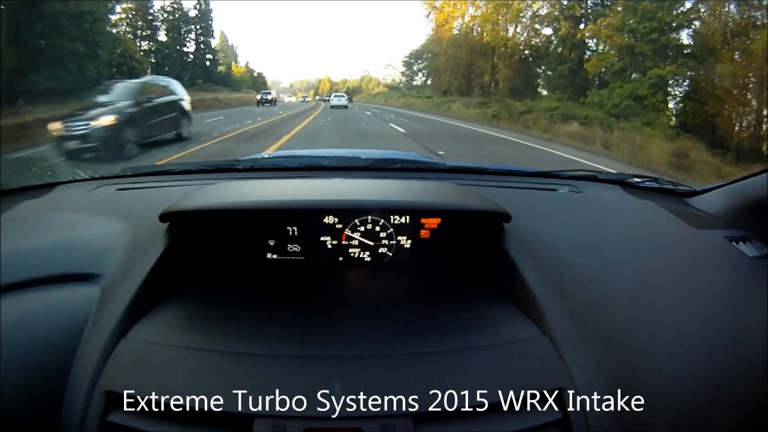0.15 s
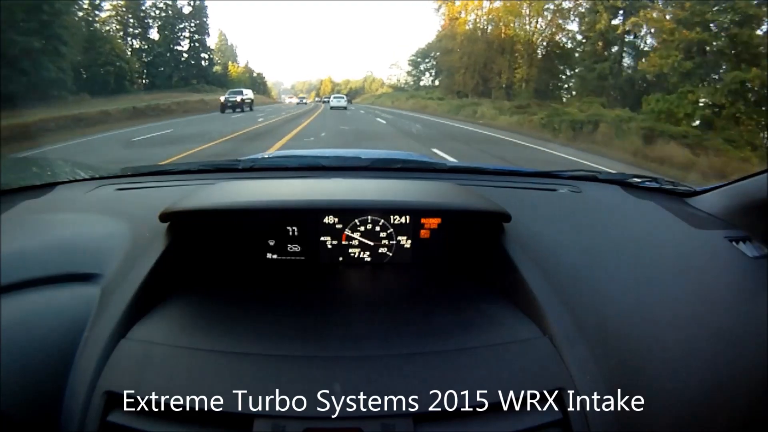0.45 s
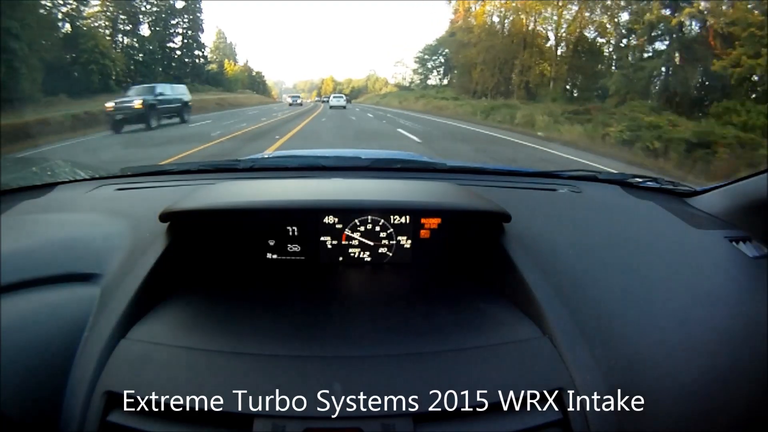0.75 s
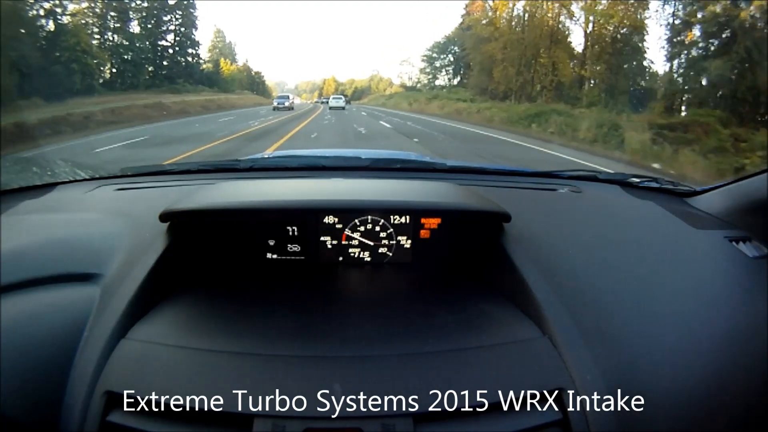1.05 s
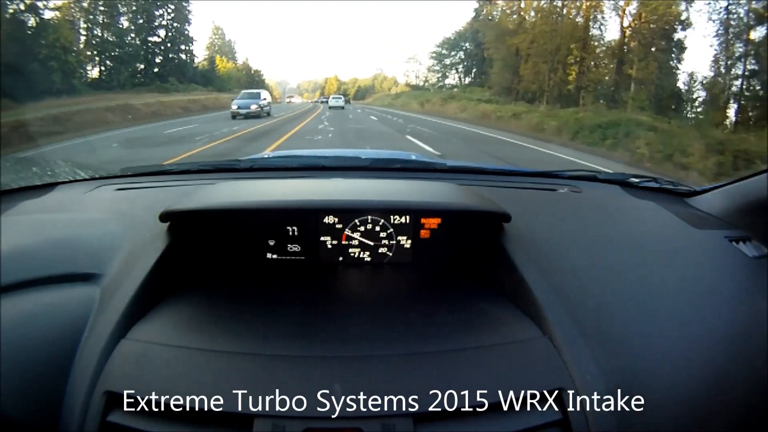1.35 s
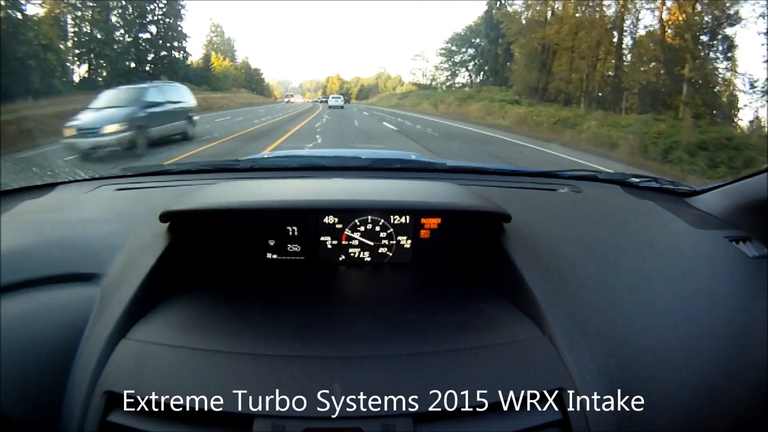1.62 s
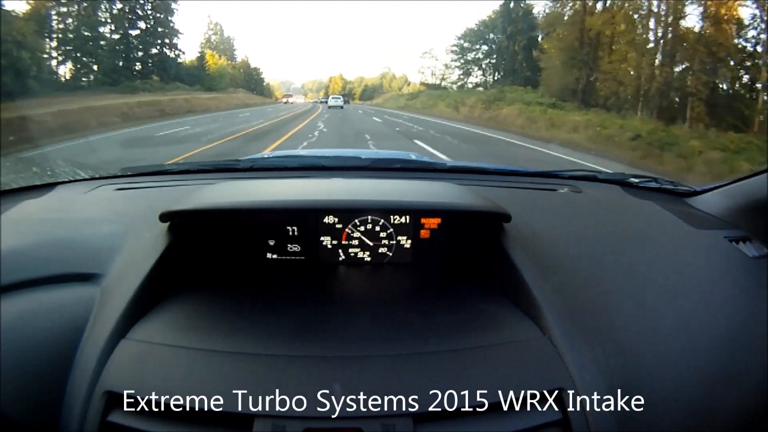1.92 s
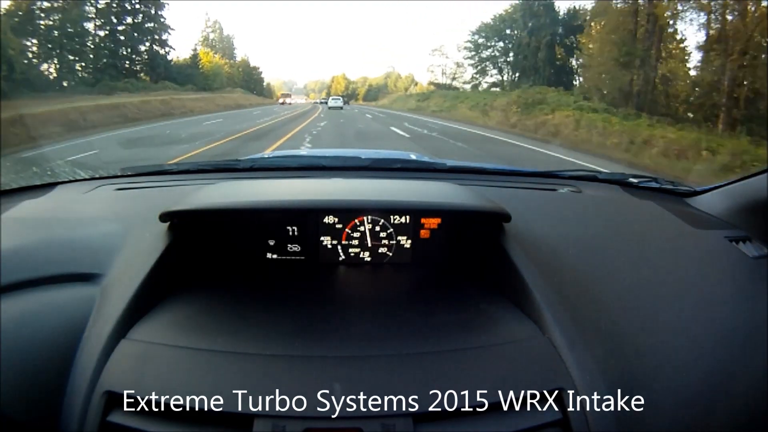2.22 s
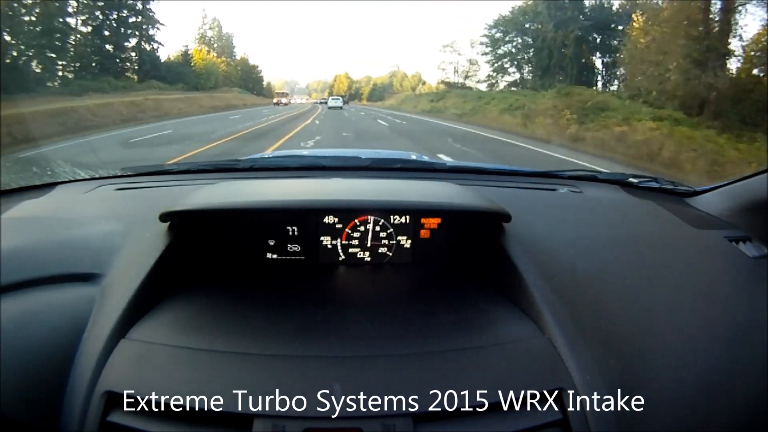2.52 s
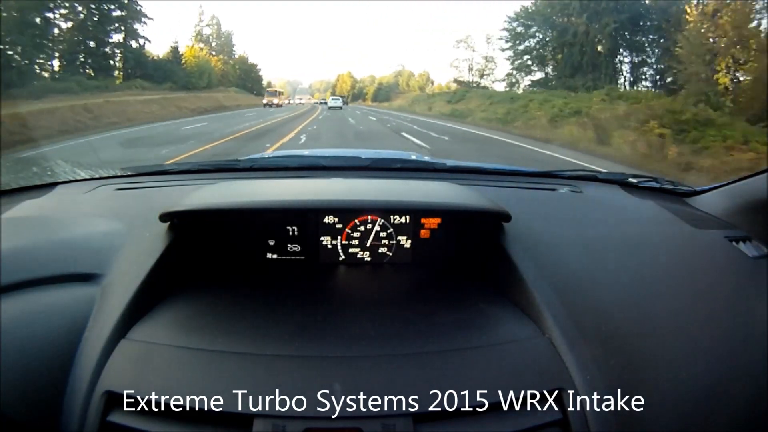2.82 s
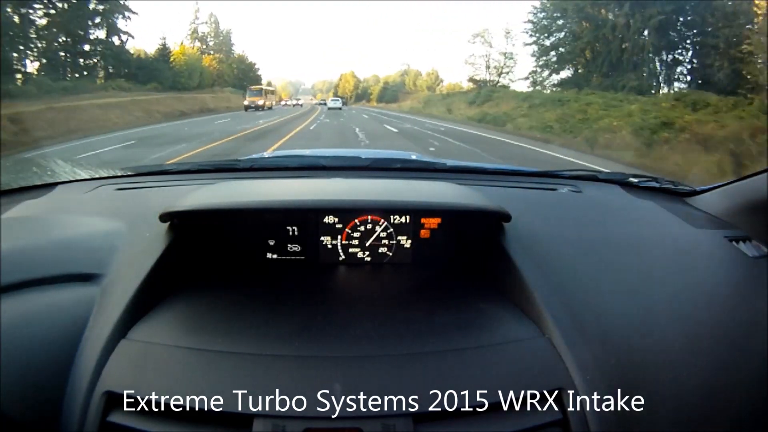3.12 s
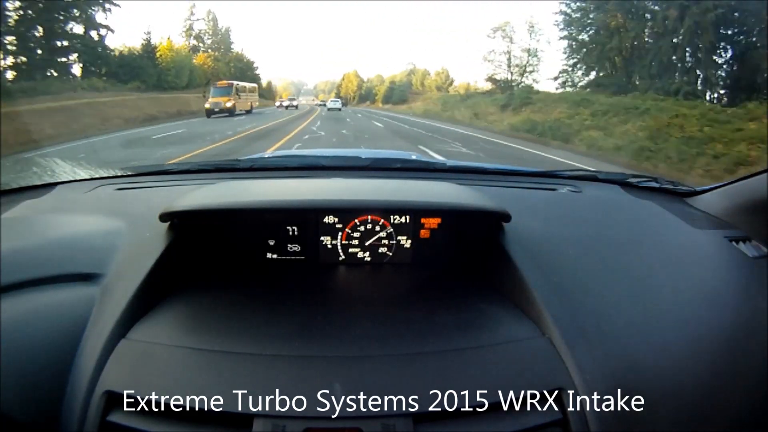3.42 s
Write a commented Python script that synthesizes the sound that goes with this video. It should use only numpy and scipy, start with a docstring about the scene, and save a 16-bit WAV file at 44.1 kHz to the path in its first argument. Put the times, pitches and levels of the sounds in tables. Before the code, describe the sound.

Car engine droning inside the cabin over road rumble, then intake hiss rising under acceleration.

```python
"""Inside a car on a highway.

A four-cylinder engine drones over road rumble and tyre roar; oncoming cars swish by. Halfway the throttle
opens: the drone's octave swells, the revs creep up and the intake hisses in its pipe resonances.
The microphone overloads on the loudest bass peaks with faint dry crackles, and a dashboard camera's
low-rate sample-and-hold adds a thin sizzle."""
import sys
import numpy as np
from scipy import signal
from scipy.fft import rfft, irfft
from scipy.io import wavfile

SR = 44100
rng = np.random.default_rng(int(sys.argv[2]) if len(sys.argv) > 2 else 0)


def store_pcm(level_fs):
    """Save levels as 16-bit WAV."""
    pcm = np.round(np.clip(level_fs, -1, 1) * 32767).astype(np.int16)
    wavfile.write(sys.argv[1], SR, np.atleast_2d(pcm).T)


N = 156996
TIME_S = np.arange(N) / SR
BINS_HZ = np.maximum(np.arange(N // 2 + 1) * SR / N, 1)


def from_db(db):
    """Decibels to gain."""
    return 10 ** (np.asarray(db) / 20)


def unit_rms(x):
    """Scale to unit rms."""
    return x / np.sqrt(np.mean(x ** 2) + 1e-20)


def curves(rows):
    """Each column after time_s, interpolated per sample."""
    time_s, *columns = np.transpose(rows)
    return [np.interp(TIME_S, time_s, column) for column in columns]


def noise(gain):
    """Unit-rms noise shaped by a gain per bin."""
    return unit_rms(irfft(rfft(rng.standard_normal(N)) * gain, N))


def colour(points):
    """Gain per bin from (freq_hz, gain_db); falls 20 dB/octave past the ends."""
    freq_hz, gain_db = np.transpose(points)
    octaves, knots = np.log2(BINS_HZ), np.log2(freq_hz)
    octaves_outside = np.abs(octaves - np.clip(octaves, knots[0], knots[-1]))
    return from_db(np.interp(octaves, knots, gain_db) - 20 * octaves_outside)


def drift(rate_hz):
    """Slow random wander, unit rms."""
    return noise(1 / (1 + (BINS_HZ / rate_hz) ** 2))


def resonant_noise(modes):
    """Sum of noise bands, each through a resonance applied twice."""
    out = 0
    for centre_hz, width_hz, level_db in modes:
        detuning = (BINS_HZ ** 2 - centre_hz ** 2) / (BINS_HZ * width_hz)
        out += from_db(level_db) * noise(1 / (1 + detuning ** 2))
    return out


def patchy_noise(points, flicker_db):
    """Unit-rms coloured noise whose octave bands flicker, partly together."""
    spectrum = rfft(noise(colour(points)))
    common = drift(14)
    out = 0
    for octave in range(4, 14):
        band = irfft(spectrum * np.maximum(1 - np.abs(np.log2(BINS_HZ) - octave), 0), N)
        out += band * from_db(flicker_db * (0.72 * common + 0.32 * drift(25)))
    return unit_rms(out)


def low_pass(x, stop_hz):
    """Steep zero-phase low-pass."""
    return signal.sosfiltfilt(signal.cheby2(14, 40, stop_hz, fs=SR, output="sos"), x, padlen=600)


def engine(phase):
    """Firing note, its load-dependent octave (delayed by the body) and weaker, unsteady orders."""
    # drone: time_s, note_db, octave_db
    drone = [(0, -17, -23), (.3, -20, -34), (1.05, -17, -31.5), (1.55, -17, -29), (1.62, -19, -22.5),
             (2.05, -18.5, -20), (2.7, -18.5, -20.5), (3.19, -19, -22.5), (3.56, -16, -24.5)]
    # weak orders: firing_multiple, level_db
    orders = [(3 / 2, -34), (5 / 2, -39.5), (6 / 2, -45)]
    note_waver_db, octave_waver_db, order_waver_db = 1.34, 0.46, 3
    octave_lag_s = 0.00033
    note_db, octave_db = curves(drone)
    late_phase = np.interp(TIME_S - octave_lag_s, TIME_S, phase)
    out = from_db(note_db + note_waver_db * drift(23)) * np.cos(phase)
    out += from_db(octave_db + octave_waver_db * drift(8)) * np.cos(2 * late_phase)
    for multiple, level_db in orders:
        gain = from_db(level_db + order_waver_db * drift(15))
        out += gain * np.cos(multiple * phase + rng.uniform(0, 2 * np.pi))
    return np.sqrt(2) * out  # levels are rms


def road_rumble():
    """The road shakes the car body: low, uneven noise."""
    # rumble spectrum: freq_hz, relative_db
    spectrum = [(15, -25), (26, -8.5), (37, 2.5), (50, 2.5), (62, -1.5), (72, -8), (90, 5), (118, 0),
                (145, -3.5), (200, -8.5), (255, -14), (300, -10.5), (420, -17.5), (600, -40.5),
                (1000, -53.5)]
    # rumble envelope: time_s, level_db
    envelope = [(0, -20), (.7, -19.5), (1.05, -20.5), (1.33, -19.5), (1.8, -20.5), (2.15, -22.5),
                (2.5, -25.5), (2.68, -21), (2.8, -25.5), (3.0, -19.5), (3.2, -23), (3.4, -22), (3.56, -30)]
    return from_db(curves(envelope)[0]) * patchy_noise(spectrum, flicker_db=1.0)


def tyre_roar():
    """Rolling tyres: flickering midrange noise."""
    # roar spectrum: freq_hz, relative_db
    spectrum = [(250, -30), (400, -0.5), (520, 3), (600, 0.5), (690, -7.5), (830, -8), (870, -11),
                (925, -6.5), (1080, -13), (1230, -11.5), (1450, -19), (1640, -17.5), (2000, -23),
                (2500, -27.5), (3100, -27), (3600, -34.5), (5000, -44.5), (6000, -55.5)]
    # roar envelope: time_s, level_db
    envelope = [(0, -34.5), (.13, -34), (.25, -37.5), (.6, -35), (1.05, -36.5), (1.3, -34.5), (1.55, -36.5),
                (1.8, -35), (1.92, -38), (2.3, -36.5), (2.5, -38.5), (2.65, -35), (2.8, -41.5), (2.92, -35),
                (3.15, -39.5), (3.4, -36), (3.56, -41)]
    return from_db(curves(envelope)[0]) * patchy_noise(spectrum, flicker_db=2.1)


def tyre_note():
    """Tyre resonances: a hollow note that swells and fades."""
    # tyre resonances: centre_hz, width_hz, relative_db
    modes = [(474, 33.4, -5), (1225, 100, -23.5)]
    # note envelope: time_s, gain_db
    envelope = [(0, -25), (.13, -30.5), (.21, -33), (.33, -34), (.42, -34), (.52, -35.5), (.68, -33.5),
                (.8, -43), (.94, -29.5), (1.06, -35), (1.26, -29), (1.44, -33), (1.58, -25.5), (1.71, -41),
                (1.82, -31.5), (2.03, -30.5), (2.25, -39), (2.52, -40), (2.63, -26.5), (2.8, -38.5),
                (3.0, -33), (3.19, -40), (3.3, -32), (3.46, -30), (3.56, -44)]
    return from_db(curves(envelope)[0]) * resonant_noise(modes)


def intake(phase):
    """Air rushes through the intake's resonances, pulsing with each cylinder's gulp."""
    # air flow: time_s, gain_db
    flow = [(0, -43.5), (2.05, -27.5), (2.22, -13.5), (2.45, -9.5), (2.64, -1.5), (2.8, -7.5), (2.89, -1),
            (3.03, -6), (3.12, -2.5), (3.27, -3), (3.37, -0.5), (3.56, -2)]
    # broad hiss spectrum: freq_hz, relative_db
    hiss = [(700, -4.5), (1400, 3), (2500, -4), (3400, -6.5), (4400, -14), (5200, -19.5), (6000, -25.5)]
    # pipe resonances: centre_hz, width_hz, level_db
    modes = [(1222, 85, -45.5), (1620, 180, -53.5), (2160, 150, -63.5), (2970, 90, -59.5),
             (3203, 100, -58.5), (3272, 70, -57), (3397, 65, -57.5), (3770, 160, -58.5), (3982, 60, -59.5),
             (4190, 60, -66.5), (4640, 130, -67.5), (5040, 340, -66)]
    hiss_db, flutter_db, pulse_depth = -50, 1.5, 0.12
    air = from_db(hiss_db) * noise(colour(hiss)) + resonant_noise(modes)
    flow_gain = from_db(curves(flow)[0] + flutter_db * drift(30))
    return air * flow_gain * (1 + pulse_depth * np.cos(phase))


def traffic():
    """Short swishes of oncoming cars through the glass."""
    # passing cars: centre_s, peak_db, half_width_s
    passes = [(.04, -43, 0.061), (.96, -49, .045), (1.62, -44, 0.06), (1.781, -42.5, 0.039)]
    # swish spectrum: freq_hz, relative_db
    spectrum = [(500, -10), (1200, 9), (1500, -6.5), (1750, 1.5), (2200, -4.5), (3000, -2.5), (3400, -10),
                (3900, -18.5), (5500, -40)]
    swell = 0
    for centre_s, peak_db, half_width_s in passes:
        swell += from_db(peak_db) / (1 + ((TIME_S - centre_s) / half_width_s) ** 2)
    return swell * patchy_noise(spectrum, flicker_db=2.5)


def overload_crackle():
    """Faint dry crackles of the microphone overloading on bass peaks: noise bursts at listed times."""
    # crackles: peak_s, relative_db
    crackles = [(.0922, -55), (.1196, -54), (.1885, -48), (.2139, -49), (.4389, -52), (.5711, -54),
                (.607, -57), (.6794, -53), (.705, -56), (.7617, -55), (.8889, -56), (.9707, -56),
                (1.4157, -51), (1.6541, -55), (1.7973, -53), (1.806, -52), (1.8692, -54), (1.9106, -57),
                (2.0777, -57), (2.126, -57), (3.407, -50)]
    # crackle spectrum: freq_hz, relative_db
    spectrum = [(800, -6.5), (2800, -4.5), (4500, -4.5), (6000, -16.5), (8000, -5.5), (14000, -8)]
    attack_s, decay_s, gain_db = 0.0007, 0.0023, 2.5
    bursts = 0
    for peak_s, relative_db in crackles:
        age_s = TIME_S - peak_s
        envelope = np.exp(-np.maximum(-age_s / attack_s, age_s / decay_s))
        bursts += from_db(relative_db + gain_db) * envelope
    return bursts * noise(colour(spectrum))


def scene():
    """Mono mix at the dashboard; engine and intake share the firing phase."""
    # engine firing rate: time_s, rate_hz
    firing = [(0, 80.8), (.5, 80.2), (.8, 79.3), (1.3, 79.3), (1.6, 78.1), (1.95, 78.2), (2.3, 79.1),
              (2.6, 80.4), (2.9, 82.0), (3.25, 83.5), (3.56, 85.0)]
    phase = 2 * np.pi * (rng.random() + np.cumsum(curves(firing)[0]) / SR)
    cabin = engine(phase) + road_rumble() + tyre_roar() + tyre_note() + traffic() + intake(phase)
    return (low_pass(cabin, stop_hz=6300) + overload_crackle())[None]


def record(dry):
    """Sample-and-hold mirrors the sound's slope on both sides of the hold rate; the top is cut."""
    hold_hz, mirror_gain_db = 12000, 0.5
    slope = np.gradient(dry, axis=-1) * SR
    mirror = slope * np.sin(2 * np.pi * hold_hz * TIME_S) / (np.pi * hold_hz)
    droop = hold_hz / np.maximum(BINS_HZ, hold_hz / 2)
    sizzle = irfft(rfft(mirror) * droop, N)
    return low_pass(dry + from_db(mirror_gain_db) * sizzle, stop_hz=15700)


dry = scene()
out = record(dry)
store_pcm(out)
```